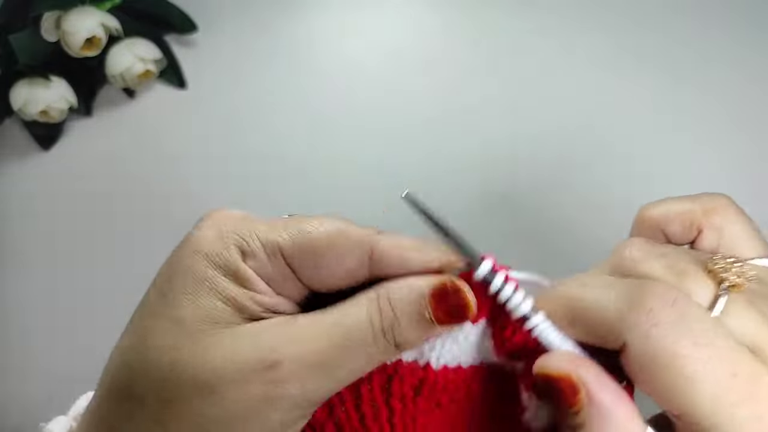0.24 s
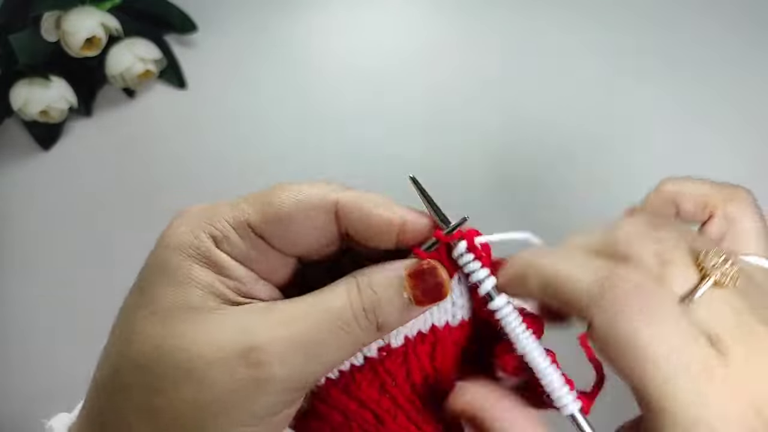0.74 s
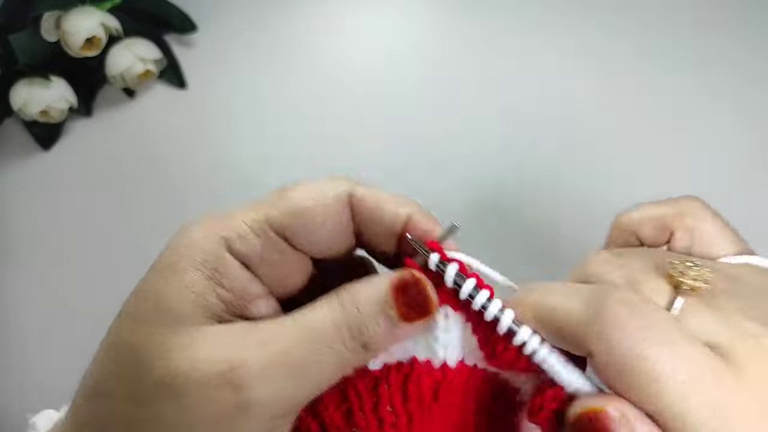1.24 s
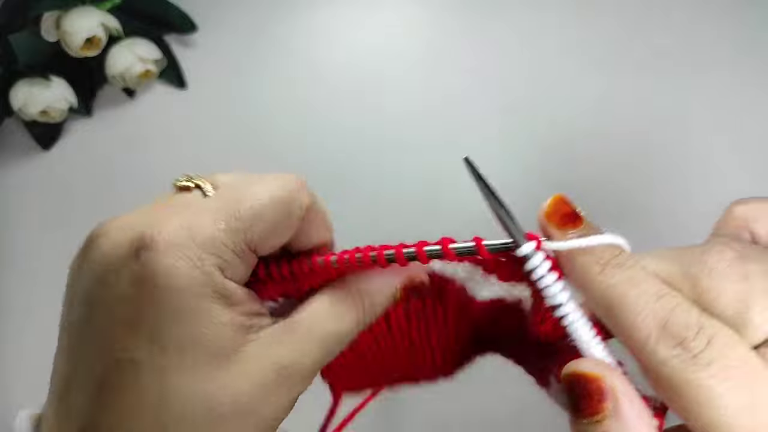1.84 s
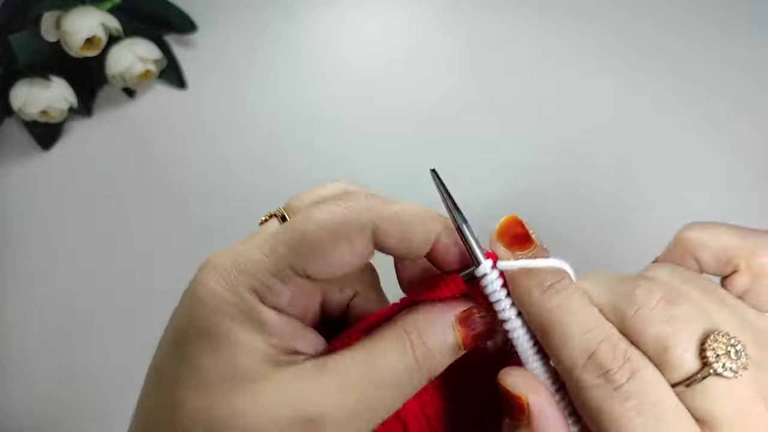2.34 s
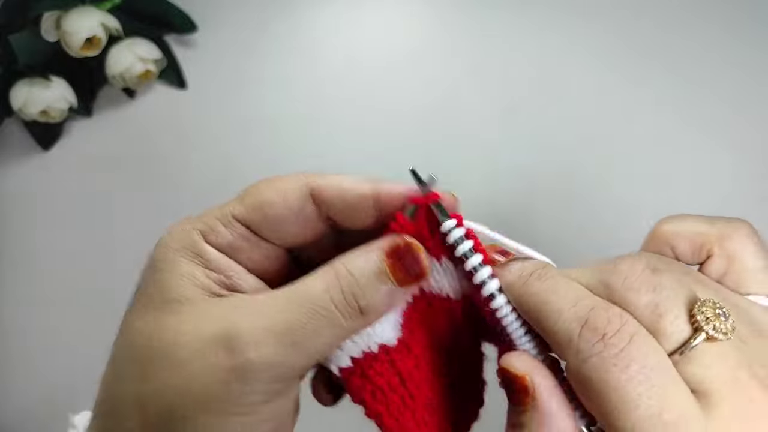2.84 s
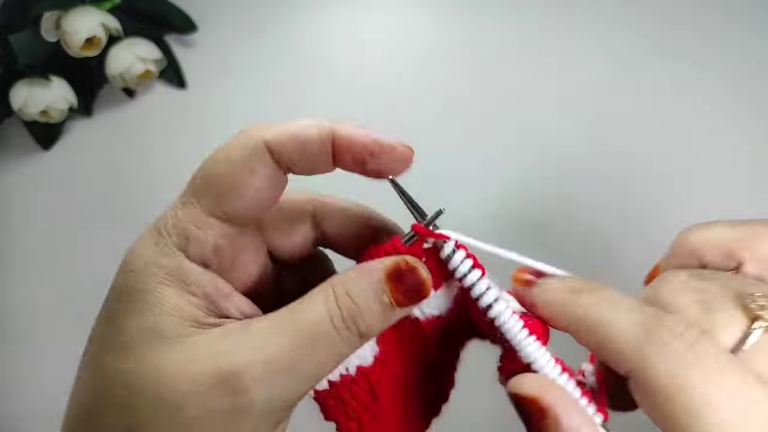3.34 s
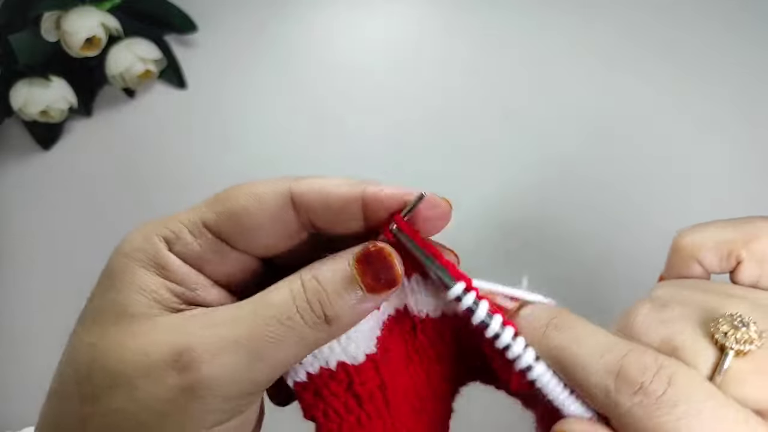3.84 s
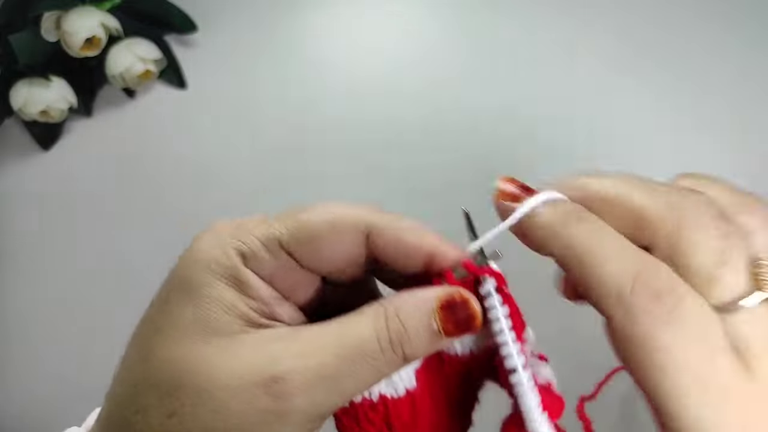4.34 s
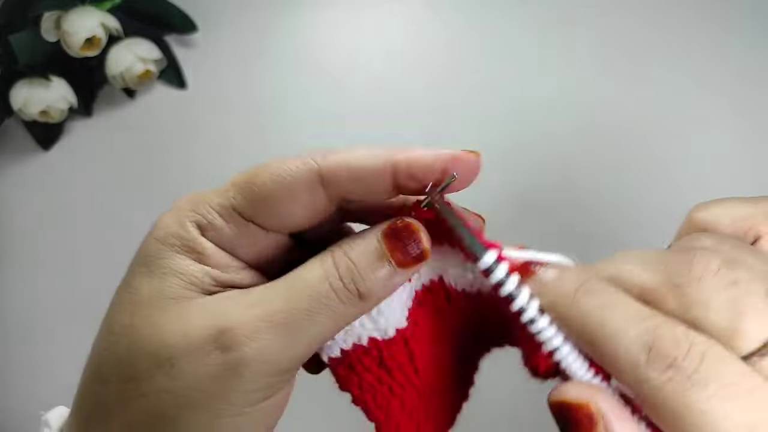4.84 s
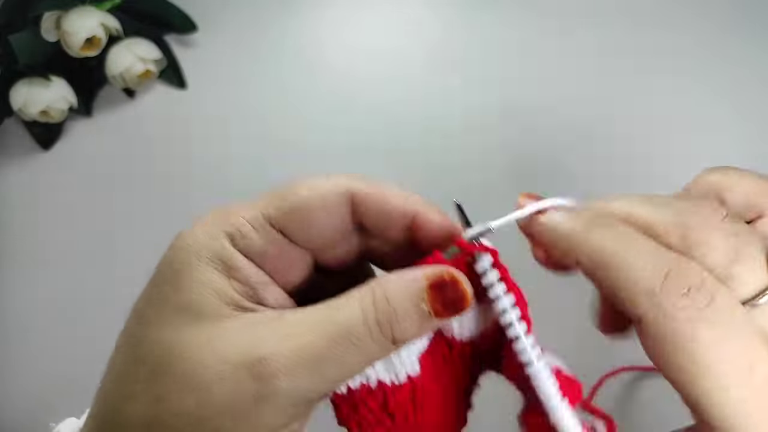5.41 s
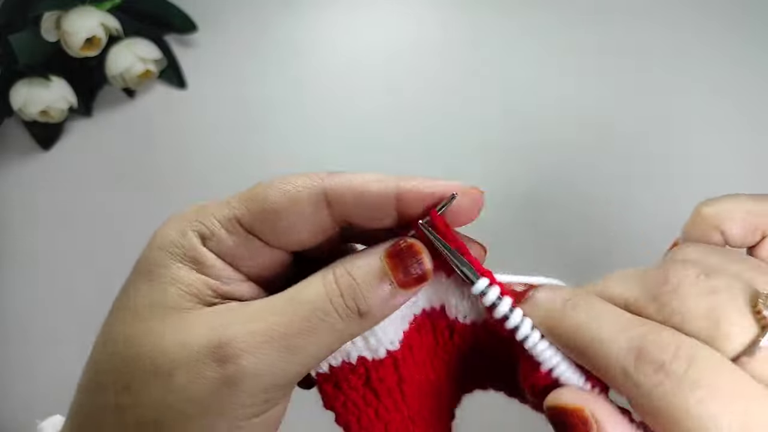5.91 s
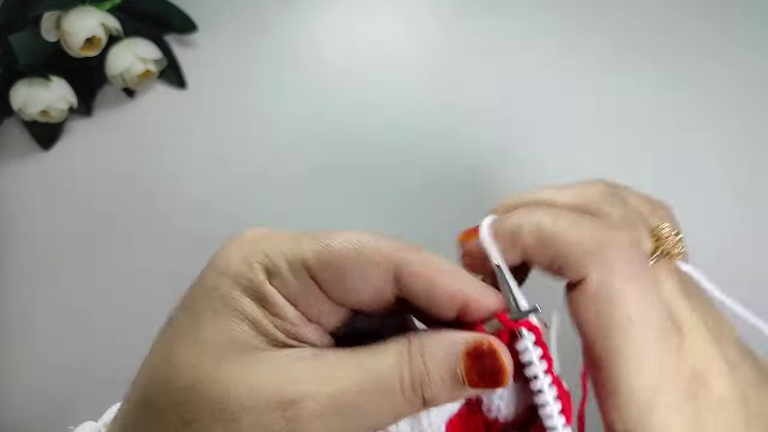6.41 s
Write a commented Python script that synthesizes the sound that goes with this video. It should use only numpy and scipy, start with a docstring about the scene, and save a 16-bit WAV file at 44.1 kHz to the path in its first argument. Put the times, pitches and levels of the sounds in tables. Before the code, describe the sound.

Small irregular clicks and soft scrapes of two metal knitting needles working wool, with a low hum and faint hiss behind.

```python
"""A quiet room, with the microphone close to two metal knitting needles working stitches.
The tips tap, then slide along each other and through the yarn; both set the same short modes ringing,
and dull knocks also thump through hands and wool. Far behind the needles lie a low rumble
with swelling hums from outside, wavering drones, a faint high whine and room hiss."""
import sys
import numpy as np
from scipy import signal
from scipy.fft import rfft, irfft, next_fast_len
from scipy.io import wavfile
from scipy.ndimage import uniform_filter1d

SR = 44100
rng = np.random.default_rng(int(sys.argv[2]) if len(sys.argv) > 2 else 0)


def unload_wav(signal):
    """Save mono or channel-first audio to the path in sys.argv[1] as 16-bit WAV at rate SR, clipped to [-1, 1]."""
    wavfile.write(
        sys.argv[1],
        SR,
        np.round(np.clip(np.atleast_2d(signal).T, -1, 1) * 32767).astype(np.int16),
    )


N = 294147


def from_db(db):
    """Gain of a level in dB."""
    return 10 ** (np.asarray(db) / 20)


def rms_one(x):
    """Scaled to rms 1."""
    return x / np.sqrt(np.mean(x ** 2) + 1e-20)


def ring(force, hz, t60):
    """A damped resonance: a unit click sets a tone of height 1 ringing."""
    radius, angle = from_db(-60 / (t60 * SR)), 2 * np.pi * hz / SR
    return signal.lfilter([.5, 0, -.5], [1, -2 * radius * np.cos(angle), radius ** 2], force + 1e-18)


# Needle modes, damped by fingers and wool: pitch_hz, level_db, t60_s (capped when played)
NEEDLE_MODES = [(300, 1, .02), (520, -9, 0.019), (800, -17, .013), (1260, 3.5, 0.0052), (1685, -3, 0.036),
                (2453, -3, 0.06), (2787, 2, 0.029), (3345, 1, 0.021), (3944, 0, 0.034), (4740, 3.5, 0.022),
                (5240, -2, 0.025), (5300, 0, 0.011), (6160, -6, 0.06), (6460, 2.5, 0.022),
                (6900, -1.5, 0.018), (7520, -1, 0.0083), (7780, -1, 0.028), (8380, 0.5, 0.01),
                (9160, 4, 0.0094), (9600, -3, 0.0097), (10200, 2.5, 0.035), (10370, 1, 0.006),
                (11090, 0.5, .025), (11430, -15.5, 0.016), (11800, -17, 0.029), (13000, -18, 0.039),
                (14000, -33, .015)]

def needles(longest_t60_s=.028, crack_t60_s=.003, mic_top_hz=12640):
    """Close to the microphone, each contact gives every mode a quick, broad crack and a longer ring."""
    slides = SLIDES + yarn_brushes()
    tap_luck_db = 2.5 * rng.standard_normal((len(TAPS), len(NEEDLE_MODES)))
    slide_luck_db = 2.5 * rng.standard_normal((len(slides), len(NEEDLE_MODES)))
    grit = rng.standard_normal((3, N)) * from_db(3.7 * rng.standard_normal(N))  # uneven surface grains
    stick_slip = from_db(1.1 * rms_one(uniform_filter1d(rng.standard_normal(N), size=150)))
    out = np.zeros(N)
    for k, (hz, level_db, t60) in enumerate(NEEDLE_MODES):
        tapping = tap_force(hz, tap_luck_db[:, k], grit[k % 3])
        sliding = slide_force(hz, slides, slide_luck_db[:, k], stick_slip * grit[k % 3])
        crack = ring(from_db(6.5) * tapping + from_db(11.5) * sliding, hz, crack_t60_s)
        ringing = ring(from_db(-5.5) * tapping + sliding, hz, min(t60, longest_t60_s))
        out += from_db(level_db) * (ringing + crack)
    return signal.sosfilt(signal.butter(3, mic_top_hz, fs=SR, output="sos"), out)


def mode_share(hz, colour, spread):
    """How much of a contact's force reaches a mode: a bell centred `colour` octaves above 1 kHz."""
    def bell(pitch_hz, centre):
        octaves_off = np.log2(pitch_hz / 1000) - np.clip(centre, .8, 3.8)
        return np.exp(-.5 * (octaves_off / max(spread, .15)) ** 2)
    all_modes = bell(np.array(NEEDLE_MODES)[:, 0], np.mean(colour))
    return bell(hz, colour) / np.sqrt(np.mean(all_modes ** 2))


# The needles tapping together: start_s, level_db, colour_oct (above 1 kHz), spread_oct
TAPS = [(0.036, -38.5, 2, 1), (.404, -20.5, 4, 0.79), (0.6762, -32, 1.75, 1.4), (0.7304, -39, 1.24, 0.61),
        (1.0181, -22.5, 3.8, 0.8), (1.1096, -48, 1.6, 1.2), (1.149, -33, 3.8, 0.77),
        (1.414, -30.5, 2.05, 1), (2.078, -31.5, 2.14, 0.73), (2.5294, -45, 1.23, 0.69),
        (2.726, -34, 3.7, 0.76), (2.829, -28, 1.69, 0.49), (3.042, -46, 1.5, 0.95), (3.249, -42, 1.55, 1.4),
        (3.288, -46, 3.3, 0.77), (3.4306, -37, 3.9, 1.1), (3.7686, -20, 3.84, 1.33),
        (3.881, -38.5, 3.17, 0.66), (4.0832, -26.5, 2.43, 1.1), (4.3926, -43, 2.7, 1.0),
        (4.457, -48, 2.5, 0.98), (4.499, -31, 3.53, 0.72), (4.8266, -30.5, 3.5, 1.6),
        (4.8668, -43, 2.9, .85), (5.0976, -39.5, 1.64, 0.61), (5.4226, -29, 2.9, 0.94),
        (5.4418, -44, 2.9, 0.87), (5.8509, -21.5, 3.75, 1.27), (6.146, -38, 2.93, 0.33),
        (6.2374, -26.5, 1.9, 1.06), (6.5852, -38.5, 2.6, 0.8), (6.6425, -40.5, 2.4, 1.1)]

def tap_force(hz, luck_db, grit, force_db=-30, jolt=.053):
    """Each tap is one blow and a dying chatter of micro-bounces; it jolts all modes a little."""
    force, t = np.zeros(N), np.arange(int(.04 * SR)) / SR
    for (start_s, level_db, colour, spread), extra_db in zip(TAPS, luck_db):
        i = round(start_s * SR)
        t60 = .019 + .0004 * (level_db + 34.5) - .0036 * (colour - 2)  # hard or dull: longer chatter
        hit = .31 * grit[i:i + len(t)] * from_db(-60 * t[:N - i] / max(t60, .001))
        hit[0] = from_db(-.5 + .2455 * (level_db + 36))  # the first blow, sharper in hard taps
        share = mode_share(hz, colour, spread) + jolt
        force[i:i + len(t)] += hit * from_db(level_db + extra_db + force_db) * share
    return force


def thuds(gain_db=-20, db_per_oct=-8, t60_s=.057):
    """Knocks thump through hands and wool: a puff of low noise, the stronger the duller the tap."""
    envelope, t = np.zeros(N), np.arange(int(.08 * SR)) / SR
    for start_s, level_db, colour, _ in TAPS:
        i = round(start_s * SR)
        onset_db = level_db + gain_db + db_per_oct * (colour - 2)
        envelope[i:i + len(t)] += from_db(onset_db - 60 * t / t60_s)[:N - i]
    band = signal.butter(2, [220, 950], "band", fs=SR, output="sos")
    return signal.sosfilt(band, envelope * 3.8 * rng.standard_normal(N))


# The tips sliding: start_s, length_s, level_db, colour_oct (above 1 kHz), spread_oct
SLIDES = [(0.039, 0.026, -45, 4, .5), (.057, 0.066, -49, 2.88, .36), (.13, 0.077, -58, 3.2, 1.0),
          (0.174, 0.019, -38.5, 3.26, .63), (.41, 0.059, -58, 3.5, .5), (.5, .12, -65, 3.8, .6),
          (.565, 0.065, -59, 3.3, .2), (.68, 0.057, -54, 0.92, 1.1), (0.731, 0.048, -49.5, 1.1, 0.6),
          (.86, .088, -66, 2.7, .7), (1.03, 0.065, -56, 3.5, .49), (1.155, 0.15, -55.5, 2.96, 0.6),
          (1.195, 0.051, -53.5, 2.9, .25), (1.29, 0.1, -58, 3.3, .86), (1.418, 0.06, -47.5, 1.77, .6),
          (1.84, 0.061, -60.5, 2.5, .8), (1.96, 0.13, -62, 2.6, .9), (2.089, 0.053, -42, 1.5, 0.75),
          (2.145, .14, -46, 1.16, 0.71), (2.285, 0.084, -53, 0.86, 0.88), (2.31, 0.018, -36, 3.2, 0.57),
          (2.542, 0.018, -52.5, 3.0, 1.0), (2.77, 0.061, -57, 3.6, .72), (2.833, 0.06, -51.5, 1.1, 1.1),
          (2.872, 0.074, -49, 1.16, .65), (2.943, 0.095, -44, 1.15, .62), (3.095, 0.091, -61, 2.7, 1.0),
          (3.31, 0.048, -54.5, 3.35, .77), (3.365, 0.068, -62, 2.7, .6), (3.435, 0.043, -50, 3.4, 0.34),
          (3.466, 0.05, -39.5, 3, .23), (3.495, 0.13, -61.5, 3.2, 0.91), (3.591, 0.018, -35, 3.01, 0.24),
          (3.78, 0.045, -52, 3.1, .45), (3.91, 0.04, -53, 3.1, .45), (3.938, 0.055, -54.5, 3.17, .15),
          (3.98, .04, -62, 2.9, .55), (4.088, 0.068, -41.5, 1.2, 0.87), (4.12, 0.12, -60, 1.1, .75),
          (4.24, 0.057, -65, 2.7, 1.0), (4.403, 0.041, -53, 2.95, .55), (4.514, .035, -49, 3.1, .66),
          (4.532, 0.075, -47.5, 2.99, .28), (4.665, .021, -39, 2.9, .37), (5.003, 0.065, -57, 3.3, .57),
          (5.1, 0.11, -45, 1.36, .68), (5.46, 0.077, -62.5, 3, .95), (5.533, 0.04, -55.5, 3, .7),
          (5.563, 0.066, -49, 2.95, .29), (5.685, 0.048, -53.5, 2.8, 1.0), (5.698, 0.019, -39, 2.92, 0.55),
          (5.86, .06, -59, 3.8, .5), (5.98, 0.032, -62.5, 3.7, .76), (6.149, 0.03, -52, 3.6, .4),
          (6.175, 0.077, -59, 2.8, .72), (6.242, 0.071, -46.5, 1.1, 0.95), (6.33, 0.037, -54, 1.2, .73),
          (6.598, 0.046, -60, 2.7, .67)]

def slide_force(hz, slides, luck_db, grit, force_db=-43, flick_s=.042, wide_oct=.85):
    """Rough surfaces drag past; a narrow colour sinks as the contact moves along the taper."""
    force, taps_s = np.zeros(N), np.array(TAPS)[:, 0]
    for (start_s, length_s, level_db, colour, spread), extra_db in zip(slides, luck_db):
        i = round(start_s * SR)
        progress = np.linspace(0, 1, max(int(length_s * SR), 8))
        # a dull slide set off by a tap is pressed at once and dies away gently
        set_off = np.any(np.abs(start_s - taps_s) < .008) and colour < 2
        rising = .083 if set_off else .42
        attack = (progress / rising) ** .39
        release = ((1 - progress) / (1 - rising)) ** (.45 + .74 * (1 - rising) ** 2)
        sharpness = 1 + (flick_s / length_s) ** 2  # short flicks come to a point
        pressure = np.minimum(attack, release) ** sharpness
        glide_oct = -.68 * max(1 - spread / wide_oct, 0) * (progress - .5)
        share = mode_share(hz, colour + glide_oct, spread)
        drag = pressure * from_db(level_db + extra_db + force_db) * share
        force[i:i + len(drag)] += drag[:N - i] * grit[i:i + len(drag)]
    return force


def yarn_brushes(count=10, lengths_s=(.04, .12), level_db=-67.5, colour_oct=2.9, spread_oct=.75):
    """Faint brushes against the yarn at chance moments, as extra rows of slides."""
    rows = []
    for when, long, loud in rng.random((count, 3)):
        start_s = when * (N / SR - lengths_s[1])
        length_s = np.interp(long, [0, 1], lengths_s)
        rows.append((start_s, length_s, level_db + 5 * (2 * loud - 1), colour_oct, spread_oct))
    return rows


def room_tail(close, t60_s=.16, level_db=-20):
    """The room answers with a short diffuse tail, duller than the direct sound."""
    t = np.arange(int(.4 * SR)) / SR
    dull_noise = signal.lfilter([1], [1, -.6], rng.standard_normal(len(t)))
    tail = dull_noise * from_db(-60 * t / t60_s) * (t > .004)
    return from_db(level_db) * signal.fftconvolve(close, tail / np.sqrt(np.sum(tail ** 2)))[:N]


# Hums from outside the room: middle_s, length_s, pitch_hz, glide_hz_per_s, level_db (rms at the crest)
HUMS = [(0.002, 0.35, 115.4, -6, -44.5), (0.388, 0.92, 43, -2.3, -39.5), (.7, 1, 134.8, 24, -53.5),
        (2.476, 0.69, 113.4, -4.5, -40), (2.701, 0.3, 63, -2, -47), (3.7, 0.67, 113.5, -16, -50),
        (4.251, 0.56, 58.6, -5.5, -46.5), (4.541, 0.68, 111.7, -1.5, -40), (5.196, 0.93, 54.08, 5.5, -42),
        (6.353, 0.57, 42.9, 22, -41.5)]

def outside_hums():
    """Low gliding tones swell and fade in a bell shape."""
    out = np.zeros(N)
    for (middle_s, length_s, hz, glide, level_db), phase in zip(HUMS, rng.random(len(HUMS))):
        t = np.arange(N) / SR - middle_s
        swell = from_db(level_db) * np.sqrt(2) * np.exp(-8 * (t / length_s) ** 2)
        out += swell * np.sin(2 * np.pi * (hz * t + glide * t ** 2 / 2 + phase))
    return out


# Drones in the background, the last a faint high whine: pitch_hz, width_hz, level_db (rms)
DRONES = [(48.26, 6.3, -48), (61.6, 16, -55), (93.2, 6.4, -57.5), (124.13, 8.2, -55.5), (255.3, 47, -71),
          (365.8, 5.6, -75.5), (425, 8.4, -75), (483, 30, -74), (8270, 120, -81)]

def drones():
    """Noise passed twice through a narrow resonance becomes a wavering tone."""
    out, white = np.zeros(N), rng.standard_normal(N + SR)
    for hz, width_hz, level_db in DRONES:
        t60 = np.log(1000) / (np.pi * width_hz)
        tone = ring(ring(white, hz, t60), hz, t60)[SR:]  # one second to settle
        out += from_db(level_db) * rms_one(tone)
    return out


# Spectra of the low rumble and of the room's hiss: frequency_hz, density_db (relative)
RUMBLE_SPECTRUM = [(8.8, -43), (15, 4.5), (48, -2), (119, -6), (141, -13), (174, -39), (200, -50.5),
                   (260, -83), (440, -120)]
HISS_SPECTRUM = [(88, -41), (150, -4), (172, -10), (194, -10), (451, -11), (605, -15.5), (896, -15.5),
                 (1250, -19.5), (1440, -19), (4310, -30), (7330, -32.5), (8250, -32), (11100, -33),
                 (15200, -38), (16400, -48)]

def room_tone(spectrum, rms_db):
    """Steady background noise, shaped to a spectrum."""
    size = next_fast_len(N)
    hz, points = np.arange(1, size // 2 + 2) * SR / size, np.array(spectrum)
    shape_db = np.interp(np.log(hz), np.log(points[:, 0]), points[:, 1], left=-90, right=-90)
    noise = irfft(rfft(rng.standard_normal(size)) * from_db(shape_db), size)[:N]
    return from_db(rms_db) * rms_one(noise)


def scene():
    """One microphone: needles up close, their room around them, the background far behind."""
    background = room_tone(RUMBLE_SPECTRUM, rms_db=-47) + outside_hums() + drones()
    background += room_tone(HISS_SPECTRUM, rms_db=-60.5)
    close = needles() + thuds()
    return (close + room_tail(close) + background)[None]


def record(dry):
    """The highest treble is cut steeply, 50 dB down from 16560 Hz."""
    return signal.sosfilt(signal.cheby2(12, 50, 16560, fs=SR, output="sos"), dry)


dry = scene()
out = record(dry)
unload_wav(out)
```